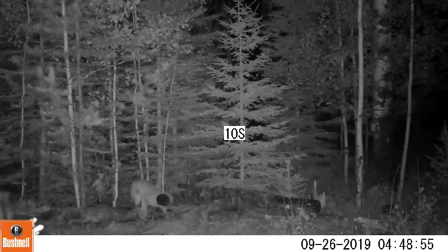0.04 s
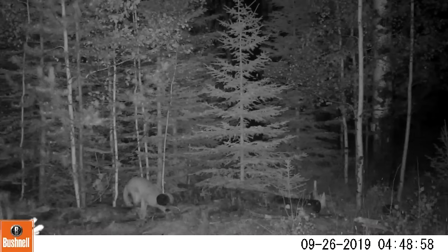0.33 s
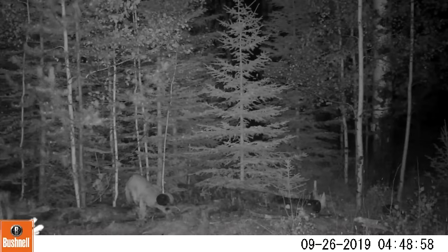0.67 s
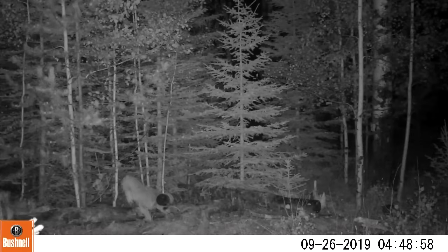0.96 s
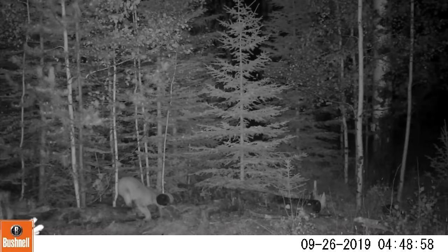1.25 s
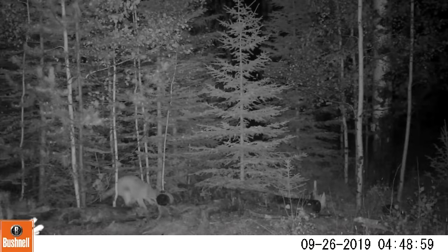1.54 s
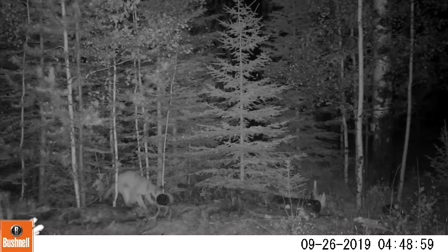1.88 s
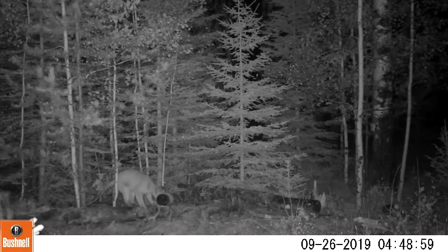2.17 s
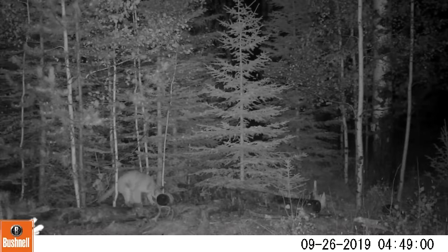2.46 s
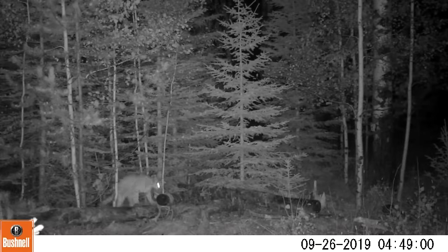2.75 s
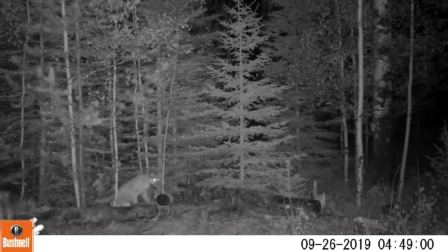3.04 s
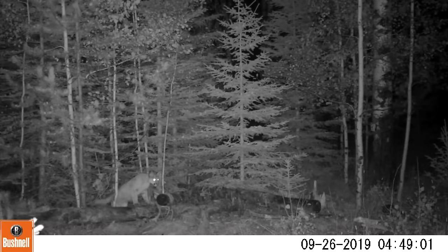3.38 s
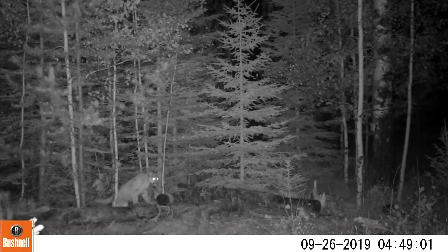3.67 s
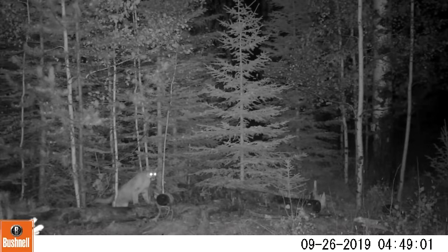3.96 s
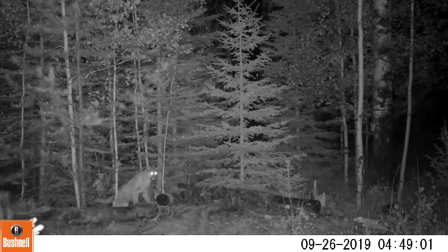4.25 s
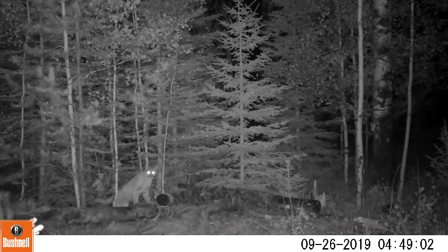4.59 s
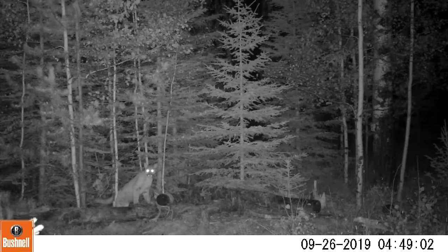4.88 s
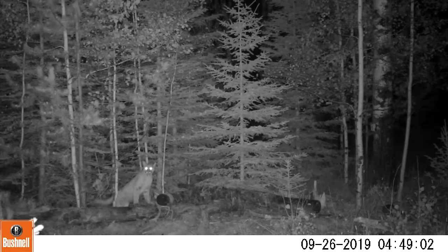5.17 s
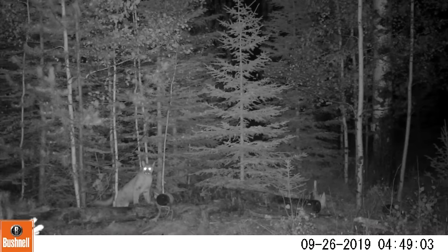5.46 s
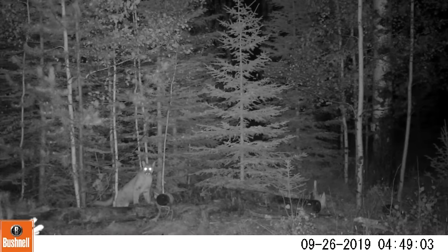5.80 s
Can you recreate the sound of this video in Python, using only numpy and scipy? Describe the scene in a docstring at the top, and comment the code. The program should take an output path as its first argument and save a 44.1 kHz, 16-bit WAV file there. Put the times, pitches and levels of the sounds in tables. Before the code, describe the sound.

In a quiet forest at night, a big cat steps on a few twigs, making small, scattered ticks. After a pause it calls once: a brief, high, nearly pure whistle that slides down in pitch and scatters lightly back from branches and trunks. Everything is heard through one mono microphone, which comes on with a soft pop and keeps up a constant, bass-heavy hiss.

```python
"""Cougar chirp in a night forest

A trail camera's microphone switches on just after the start and lays a steady dull hiss under everything.
A few twigs tick under a cougar's paws. Then, led in by thin squeaks, the cat gives one short chirp:
a falling whistle that scatters back from the branches close by and the trunks deeper in the wood."""
import sys
import numpy as np
from scipy import signal
from scipy.fft import rfft, irfft
from scipy.io import wavfile

SR = 44100
rng = np.random.default_rng(int(sys.argv[2]) if len(sys.argv) > 2 else 0)


def store_pcm(level_fs):
    """Save levels as 16-bit WAV."""
    pcm = np.round(np.clip(level_fs, -1, 1) * 32767).astype(np.int16)
    wavfile.write(sys.argv[1], SR, np.atleast_2d(pcm).T)


N = 265923


def from_db(db):
    """Decibels to gain."""
    return 10 ** (np.asarray(db) / 20)


def rms_one(x):
    """Scale to an rms of 1."""
    return x / np.sqrt(np.mean(x ** 2) + 1e-20)


def seconds():
    """The time of every sample."""
    return np.arange(N) / SR


def dying(start_s, t60_s):
    """An envelope that jumps to 1 at start_s and falls 60 dB in t60_s."""
    age = seconds() - start_s
    return (age >= 0) * from_db(-60 * np.clip(age / t60_s, 0, 5))


def drift(rate_hz):
    """A smooth random wander with an rms of 1."""
    r = np.exp(-2 * np.pi * rate_hz / SR)
    return rms_one(signal.lfilter([1], [1, -2 * r, r * r], rng.standard_normal(N)))


def resonance(x, hz, width_hz):
    """A two-pole resonance with a gain of 1 at its peak."""
    r = np.exp(-np.pi * width_hz / SR)
    feedback = [1, -2 * r * np.cos(2 * np.pi * hz / SR), r * r]
    return signal.lfilter(np.array([1, 0, -1]) * (1 - r * r) / 2, feedback, x)


# Noise floor of the camera's microphone: frequency_hz, relative_density_db
HISS_SPECTRUM = [(8, 2), (16, -2.1), (45, 0.5), (100, -3), (200, -6.5), (400, -12.5), (800, -19.5),
                 (1600, -26.5), (3000, -32), (6000, -37.5), (10000, -40), (15000, -42)]


def microphone_hiss(level_db=-38.5):
    """The microphone's own steady noise, strongest in the bass."""
    hz, density_db = np.transpose(HISS_SPECTRUM)
    bins_hz = np.maximum(np.fft.rfftfreq(N, 1 / SR), 1)
    colour = from_db(np.interp(np.log(bins_hz), np.log(hz), density_db))
    hiss = irfft(rfft(rng.standard_normal(N)) * colour, N)
    return from_db(level_db) * rms_one(hiss)


def scatter(x, gain_db, delay_s, t60_s, echoes_per_s):
    """Many small echoes from trunks and branches, weaker the farther they travel."""
    echoes = rng.standard_normal(N) * (rng.random(N) < echoes_per_s / SR) * dying(delay_s, t60_s)
    echoes /= np.sqrt(np.sum(echoes ** 2) + 1e-20)
    return from_db(gain_db) * signal.fftconvolve(x, echoes)[:N]


def forest_echoes(x):
    """Near branches answer at once and favour the treble; the deep wood gives a longer, duller tail."""
    near = scatter(x, gain_db=-8.5, delay_s=0.0022, t60_s=0.35, echoes_per_s=4700)
    far = scatter(x, gain_db=-20, delay_s=0.042, t60_s=0.98, echoes_per_s=4500)
    return resonance(near, hz=4460, width_hz=680) + resonance(far, hz=3080, width_hz=550)


# Twigs on the forest floor, under the paws: start_s, peak_db, low_hz, high_hz, t60_s
TWIG_SNAPS = [(1.735, -42, 4500, 5300, .04), (1.7557, -34.5, 2400, 5200, 0.01),
              (2.821, -40, 1300, 4600, .03), (3.734, -48, 5000, 6100, .025)]


def twigs():
    """Each twig gives a brief crackle of breaking fibres, heard in the band where its wood rings."""
    out = np.zeros(N)
    for start_s, peak_db, low_hz, high_hz, t60_s in TWIG_SNAPS:
        wood = signal.butter(2, [low_hz, high_hz], "band", fs=SR, output="sos")
        burst = rng.standard_normal(N) * dying(start_s, t60_s)
        crackle = signal.sosfilt(wood, burst + 1e-18)
        out += from_db(peak_db) * crackle / np.max(np.abs(crackle))
    return out


def whistle(hz, strength, octave_db, jitter, shimmer_db, flutter_hz):
    """The cat's voice: a nearly pure tone with a faint octave, fluttering in pitch and strength."""
    pitch_hz = hz * (1 + jitter * drift(flutter_hz))
    phase = 2 * np.pi * np.cumsum(pitch_hz) / SR
    shimmer = from_db(shimmer_db * drift(flutter_hz))
    # the octave carries only while it sweeps through a high resonance of the mouth
    octave = np.sin(2 * phase)
    for _ in range(2):  # twice, for steeper skirts
        octave = resonance(octave, hz=8500, width_hz=820)
    return np.sqrt(2) * strength * shimmer * (np.sin(phase) + from_db(octave_db) * octave)


# Thin squeaks, faint at the microphone: start_s, length_s, pitch_hz, glide_hz_per_s, level_db
LEAD_IN_SQUEAKS = [(5.028, 0.025, 5720, 17000, -63), (5.089, .016, 6430, -18000, -63),
                   (5.108, .05, 6040, -13000, -66)]


def squeaks():
    """Each squeak before the chirp is a straight, high glide that swells and dies in one arch."""
    out = np.zeros(N)
    for start_s, length_s, pitch_hz, glide_hz_per_s, level_db in LEAD_IN_SQUEAKS:
        age = np.clip(seconds() - start_s, 0, length_s)
        hz = pitch_hz + glide_hz_per_s * age
        strength = from_db(level_db) * np.sin(np.pi * age / length_s)
        out += whistle(hz, strength, octave_db=-40, jitter=0.005, shimmer_db=2.5, flutter_hz=100)
    return out


# The cougar's call sinks, plunges, eases and drops as the voice stops: time_s, pitch_hz
CHIRP_CONTOUR = [(5.125, 4720), (5.167, 4370), (5.205, 4039), (5.219, 3740), (5.241, 3235), (5.275, 2886),
                 (5.285, 2390)]


def chirp(start_s=5.124, swell_s=0.09, hold_s=0.055, gain_db=-32):
    """One falling whistle whose effort swells, holds and is cut off."""
    swell_db, release_db_per_s = 24.5, 1250
    mouth_hz, mouth_width_hz, mouth_db = 3610, 330, 9
    age = seconds() - start_s
    effort_db = np.interp(age, [0, swell_s], [-swell_db, 0])
    effort_db -= release_db_per_s * np.maximum(age - swell_s - hold_s, 0)
    hz = np.interp(seconds(), *np.transpose(CHIRP_CONTOUR))
    # the whistle flares as it falls through the main resonance of the mouth
    flare_db = mouth_db * np.exp(-((hz - mouth_hz) / mouth_width_hz) ** 2)
    strength = from_db(gain_db + effort_db + flare_db) * (age >= 0)
    return whistle(hz, strength, octave_db=-25, jitter=0.0014, shimmer_db=1.7, flutter_hz=150)


def scene():
    """The cat heard directly and off the trees, over the hiss of one mono microphone."""
    cat = chirp() + squeaks() + twigs()
    return (cat + forest_echoes(cat) + microphone_hiss())[None]


def record(dry):
    """The microphone switches on with a soft pop as its bias settles; the top is cut steeply."""
    switch_on_s, pop_db, cutoff_hz = 0.0827, -24.5, 15480
    pop = -from_db(pop_db) * dying(switch_on_s, t60_s=0.85)
    live = dry * (seconds() >= switch_on_s) + pop
    low_pass = signal.firwin(1001, cutoff_hz, fs=SR, window="blackman")
    return signal.fftconvolve(live, low_pass[None], mode="same", axes=1)


dry = scene()
out = record(dry)
store_pcm(out)
```